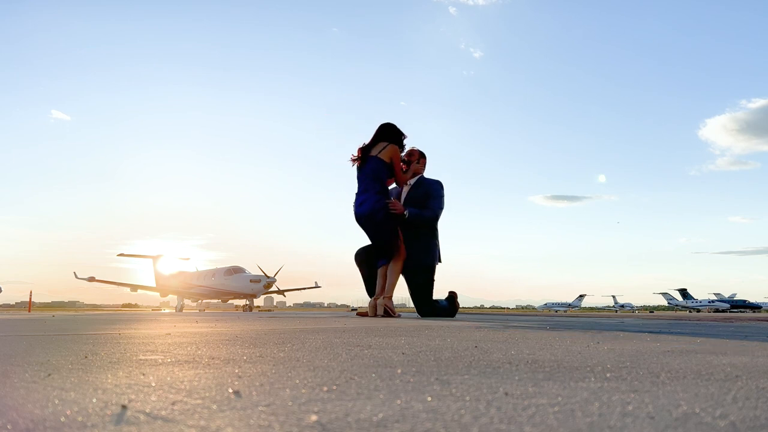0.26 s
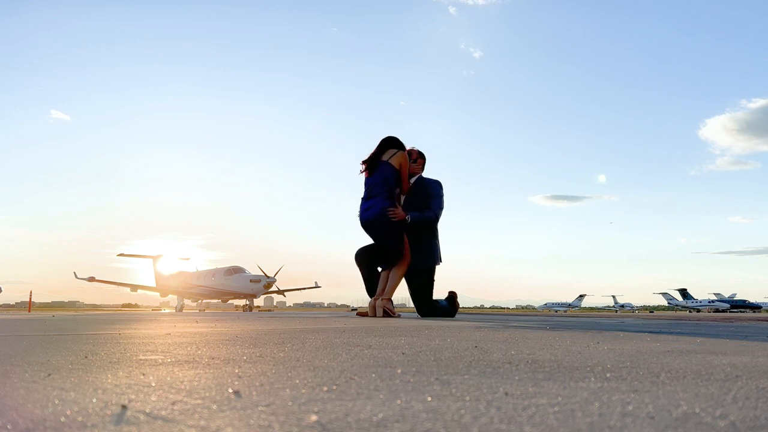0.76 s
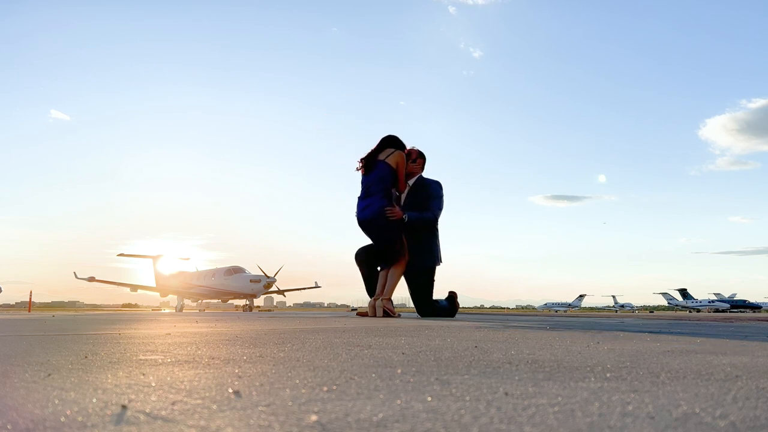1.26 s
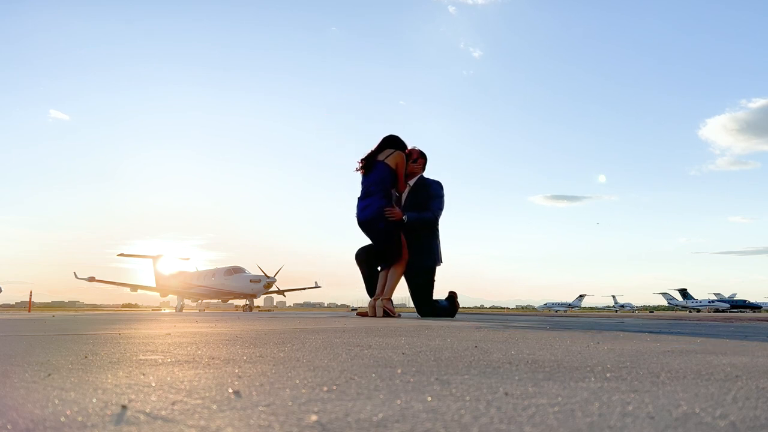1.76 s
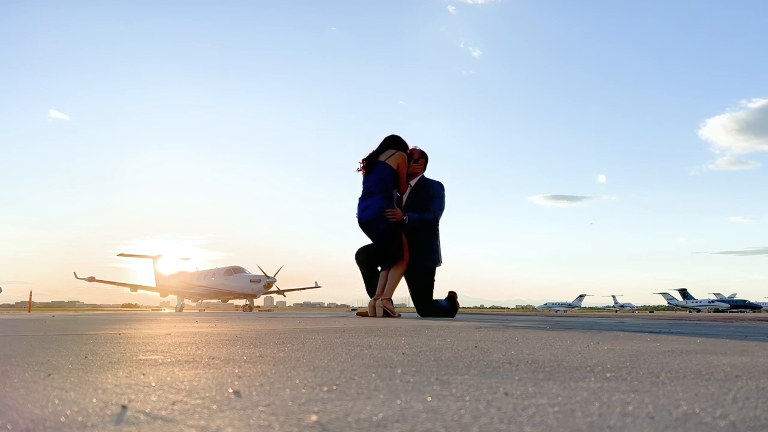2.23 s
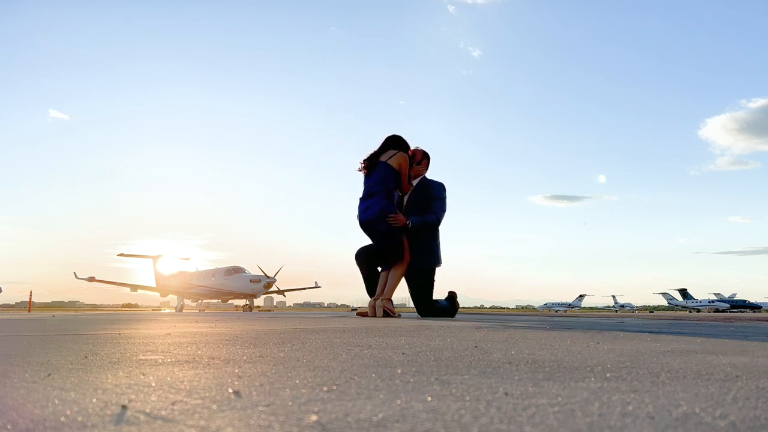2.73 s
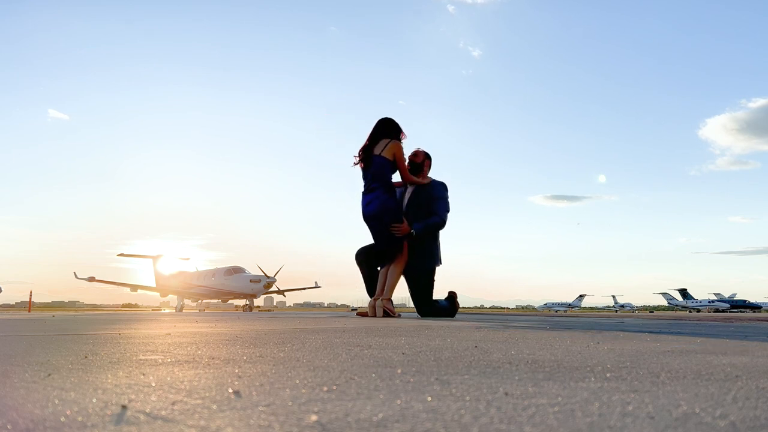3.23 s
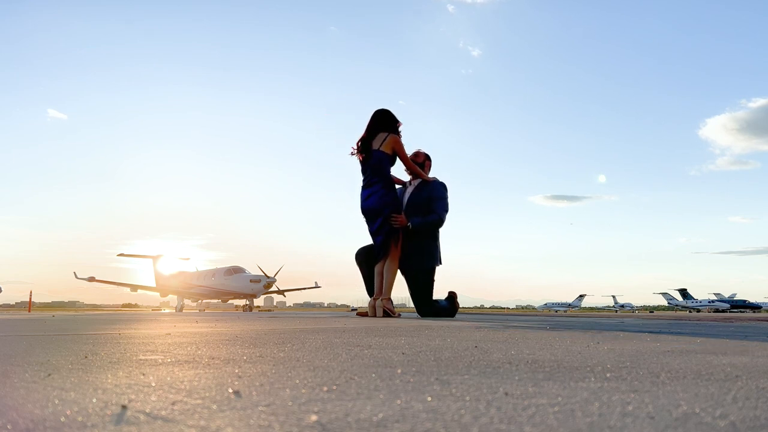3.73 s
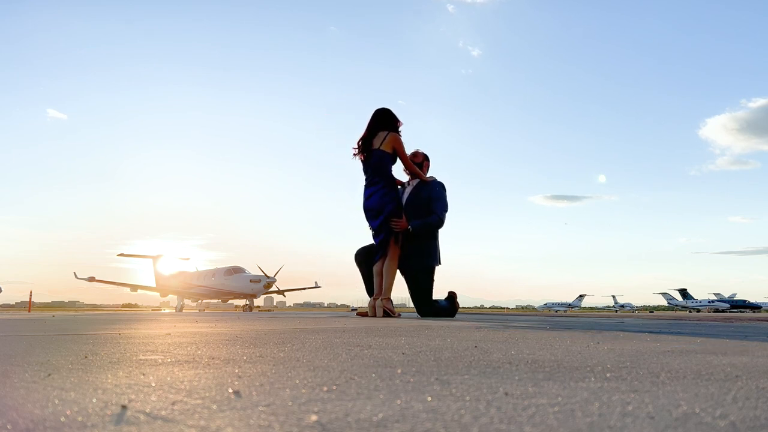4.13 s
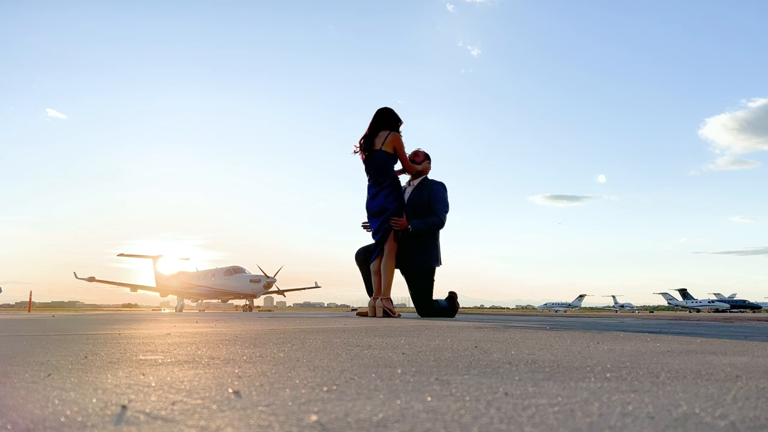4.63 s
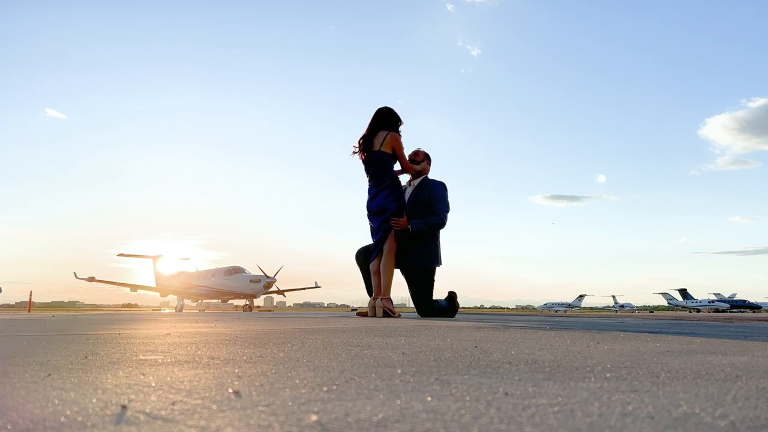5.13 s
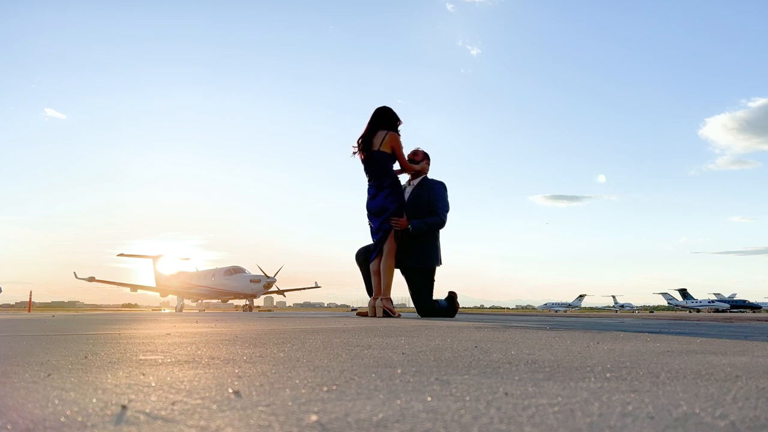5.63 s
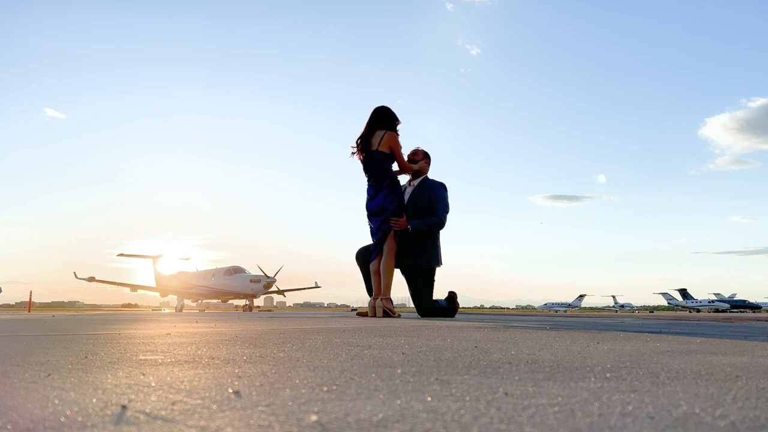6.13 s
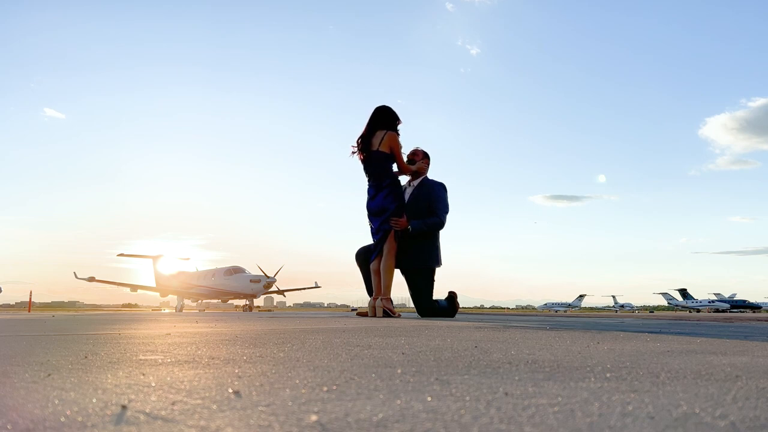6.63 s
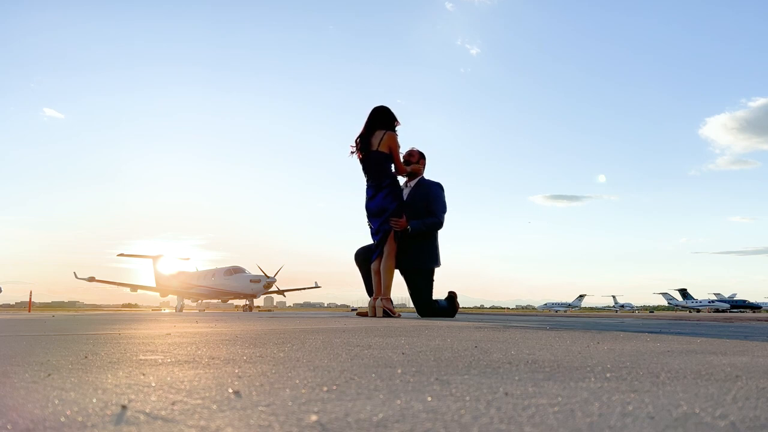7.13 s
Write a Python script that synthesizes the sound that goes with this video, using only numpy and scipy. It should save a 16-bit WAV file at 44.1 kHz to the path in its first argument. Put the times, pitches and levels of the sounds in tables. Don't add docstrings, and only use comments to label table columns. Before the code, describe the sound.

Outdoors on an airport apron, two far propeller aircraft hold a low, steady drone whose throbbing gradually quickens over a dull rumble. Faint crickets chirp. Close to a low stereo microphone, a shoe scrapes grit, then a small motor ticks rapidly until about three seconds. After that come heavy soft thuds of steps, crunching grit and cloth rustle, thinning to sparse crackles at the end.

```python
import sys
import numpy as np
from scipy import signal
from scipy.fft import rfft, irfft, next_fast_len
from scipy.io import wavfile
from scipy.ndimage import uniform_filter1d

SR = 44100
rng = np.random.default_rng(int(sys.argv[2]) if len(sys.argv) > 2 else 0)


def magnitude_from_level(level_db):
    exponent = np.asarray(level_db, float) / 20
    return 10 ** exponent


def materialize(psi):
    bounded = np.clip(np.atleast_2d(psi).T, -1, 1)
    quanta = np.round(bounded * 32767).astype(np.int16)
    wavfile.write(sys.argv[1], SR, quanta)


N = 325899
T = np.arange(N) / SR
M = next_fast_len(N + 4096)
HZ = np.arange(M // 2 + 1) * SR / M + 1e-3


def times(length_s):
    return np.arange(int(length_s * SR)) / SR


def follow(table, t=T):
    return np.interp(t, *np.transpose(table))


def walk(rate):
    steps = np.repeat(rng.standard_normal(int(N / SR * rate) + 2), 8)
    steps = uniform_filter1d(steps, 8)
    return 1.91 * np.interp(T, np.arange(len(steps)) / 8 / rate, steps)


def band(x, lo_hz, hi_hz):
    edges = [lo_hz, min(hi_hz, SR * .45)]
    return signal.sosfilt(signal.butter(3, edges, "band", fs=SR, output="sos"), x)


def unit(x):
    return x / np.sqrt(np.mean(x ** 2))


def ports(x, pan_db, lag):
    return np.array([np.roll(x, lag) * magnitude_from_level(pan_db / 2), x * magnitude_from_level(-pan_db / 2)])


def add(out, s, x):
    i = int(s * SR)
    n = min(x.shape[1], N - i)
    out[:, i:i + n] += x[:, :n]


# (frequency [Hz], left phase [rad], left minus right [dB])
SHADOW = [(280, 0, 0.5), (1040, -3, 3.5), (2000, -4.5, 3.5), (3200, -5.5, 1), (4330, -5.5, 6.5),
          (4500, -4, 5), (6130, -11.5, 6.5), (6960, -10.5, 1.3), (7760, -17.5, 0), (12000, -26, 4),
          (15600, -33, -2)]


def shadow():
    hz, phase, db = np.transpose(SHADOW)
    return magnitude_from_level(np.interp(HZ, hz, db)) * np.exp(1j * np.interp(HZ, hz, phase))


# (frequency [Hz], spectral density [dB per Hz])
ROAR = [(20, -93), (30, -87.5), (50, -64.5), (100, -63.5), (190, -72), (330, -78.5), (600, -84),
        (950, -88.5), (1250, -96), (1600, -104), (2200, -109.5), (3300, -121), (6000, -123), (9000, -128),
        (15000, -141)]
# (frequency [Hz], share [0-1])
ALIKE = [(60, .95), (150, 0.58), (300, 0.28), (700, 0.12), (2000, 0.87), (8000, 0.03)]
# (time [s], level [dB])
SWELL = [(0.0, -56.5), (0.82, -57), (1.58, -57), (7.0, -57.5), (7.39, -55.5)]


def roar():
    octave = np.log2(HZ)
    roar_hz, density_db = np.transpose(ROAR)
    alike_hz, alike = np.transpose(ALIKE)
    colour = magnitude_from_level(np.interp(octave, np.log2(roar_hz), density_db)) * np.sqrt(SR / 2)
    share = np.clip(np.interp(octave, np.log2(alike_hz), alike), 0, 1)
    common, left, right = rfft(rng.standard_normal((3, M)))
    side = shadow()
    coherent = np.sqrt(share) * common * np.array([side, np.ones_like(side)])
    separate = np.sqrt(1 - share) * np.array([left * abs(side), right])
    pair = colour * (coherent + separate)
    swell_db = follow(SWELL)
    swell_db = swell_db - swell_db.mean()
    out = 0
    for centre in np.arange(4, 15, .5):
        part = np.clip(1 - 2 * abs(octave - centre), 0, 1)
        swell_share = np.exp(-((centre - 9.8) / 3.1) ** 2)
        flicker_db = 1.2 * walk(6) + 3.5 * (centre > 13.7) * walk(22)
        out = out + magnitude_from_level(swell_share * swell_db + flicker_db) * irfft(pair * part, M)[:, :N]
    return out


def drifts():
    moan_db = np.interp(T, [0, .6, 1.3, 1.8], [-73.0, -57.0, -60.5, -82.0])
    moan = unit(band(rng.standard_normal(N), 470, 560)) * magnitude_from_level(moan_db)
    gust_db = -54 - 14 * (T - 4.1) ** 2 + 6 * walk(11)
    return moan + magnitude_from_level(gust_db) * unit(band(rng.standard_normal((2, N)), 25, 120))


# (time [s], level [dB])
JET = [(0, -74), (.45, -74), (.8, -86), (3.2, -85.5), (3.45, -67), (3.7, -89), (4.25, -90), (4.5, -72),
       (4.75, -88), (5.5, -81), (5.85, -92), (6.3, -82), (6.6, -70), (6.85, -87.5), (7.39, -76)]


def jet():
    return unit(band(rng.standard_normal((2, N)), 950, 1750)) * magnitude_from_level(follow(JET))


# (start [Hz], fall [Hz], stroke [s], echo delay [s], echo [dB], level [dB],
# left minus right [dB], first gap [s], growth of each gap [s], opening stroke [dB])
NEAR_CRICKET = (4590, 470, .024, .013, -16, -.5, 4.3, .0432, .0058, -6)
FAR_CRICKET = (4630, 400, .023, .0245, -8, -4, 8.5, .033, .0014, -11)
# (time [s], strokes [count], peak [dB], last stroke [dB])
NEAR_CHIRPS = [
    (.8584, 4, -59.5, -1.5),
    (2.1595, 4, -60.5, -3),
    (3.241, 4, -60.5, -1.5),
    (4.47, 4, -66.5, -1.5),
    (6.228, 4, -63.5, -1),
]
FAR_CHIRPS = [
    (.697, 4, -65, 2.5),
    (1.303, 4, -64, 0),
    (1.885, 4, -65.5, 0.5),
    (2.619, 4, -65.5, -4),
    (3.355, 4, -66, -3),
    (4.333, 4, -69.5, -1),
    (5.577, 4, -67, -15.5),
    (6.557, 4, -69, 2.5),
    (7.28, 4, -67.5, 2),
]


def cricket(chirps, voice):
    hz, fall_hz, length, echo_s, echo_db, trim_db, pan_db, gap, stretch, opening_db = voice
    opening_drop_hz, tail_db, tail_t60_s = 130, -12, 0.14
    swell_db = [opening_db, -1.5, 0, 0, 0]
    out, t = np.zeros((2, N)), times(.09)
    progress = np.clip(t / length, 0, 1)
    shape = np.sin(np.pi * progress ** .95) ** 1.2
    chances = rng.standard_normal((len(chirps), 5, 2))
    for (s, strokes, db, last_db), chance in zip(chirps, chances):
        strokes = round(strokes)
        for k in range(strokes):
            start_hz = hz + 30 * chance[k, 0] - opening_drop_hz * (k == 0)
            glide = start_hz - fall_hz * progress ** 2.3
            stroke = shape * np.sin(2 * np.pi * np.cumsum(glide) / SR)
            echoes = np.roll(stroke, int(echo_s * SR)) + .4 * np.roll(stroke, int(2.4 * echo_s * SR))
            stroke = stroke + magnitude_from_level(echo_db) * echoes
            stroke_db = db + trim_db + swell_db[k] + last_db * (k == strokes - 1) + chance[k, 1]
            start = s + k * gap + stretch * k * (k - 1) / 2 - .0055
            add(out, start, ports(magnitude_from_level(stroke_db) * stroke, pan_db, 10))
    t = times(.1)
    tail = rng.standard_normal((2, len(t))) * magnitude_from_level(-60 * t / tail_t60_s) * (t > .004)
    tail = tail / np.sqrt(np.sum(tail ** 2) / 2)
    return out + magnitude_from_level(tail_db) * signal.fftconvolve(out, tail, axes=1)[:, :N]


def grains(rate, scatter_db):
    hits = (rng.random(N) < rate / SR) * magnitude_from_level(scatter_db * rng.exponential(size=N))
    return unit(rng.standard_normal(N) * (1 + signal.lfilter([1], [1, -.97], hits)))


# (from [s], to [s], 1.4-3 kHz [dB], 5.8-9.6 kHz [dB], 7.1-12 kHz [dB])
SCUFFS = [(0, 0.03, -68, -68, -73), (0.299, 0.316, -63, -62, -52.5), (0.327, 0.387, -67, -62.5, -71.5),
          (2.722, 2.734, -61, -75, -94), (3.208, 3.241, -74, -74, -84), (3.92, 3.929, -67, -63, -74.5),
          (3.943, 3.949, -64, -84, -89.5), (3.956, 3.996, -77, -79, -88.5), (4.064, 4.302, -78, -91, -105),
          (4.863, 4.967, -72.5, -79, -100), (5.999, 6.003, -68.5, -70, -68),
          (6.095, 6.123, -71.5, -77, -78.5), (6.199, 6.307, -76.5, -90, -90),
          (6.412, 6.498, -79.5, -77.5, -78.5), (6.859, 6.91, -81.5, -79, -83),
          (7.043, 7.082, -85, -82, -81)]


def scuffs():
    grit = grains(610, 2.4)
    bands_hz = [(1400, 3050), (5800, 9600), (7100, 12000)]
    layers = [unit(band(grit, *edges)) for edges in bands_hz]
    drag = np.zeros(N)
    for start, end, *levels in SCUFFS:
        span = slice(int(start * SR), int((end + 0.024) * SR))
        gate = np.interp(T[span], [start, start + 0.0022, end, end + 0.015], [0.28, 1.54, 0.59, 0.05])
        drag[span] += gate * sum(magnitude_from_level(db) * layer[span] for db, layer in zip(levels, layers))
    return ports(drag, -1.2, 0)


# (time [s], 2-8 kHz level [dB])
CLOTH = [(0.0, -75), (0.66, -83), (0.9, -89), (1.09, -91.5), (1.83, -91), (2.7, -78), (3.07, -71),
         (3.38, -71.5), (3.6, -74), (3.72, -84), (3.87, -69), (4.03, -77.5), (4.15, -74), (4.3, -75),
         (4.45, -75.5), (4.67, -87), (5.45, -78), (5.6, -72.5), (5.76, -96), (5.99, -90), (6.25, -74),
         (6.48, -77.5), (6.83, -97.5), (7.39, -90)]


def cloth():
    rub = unit(band([grains(180, 2.8) for port in "LR"], 1800, 7200))
    return rub * magnitude_from_level(follow(CLOTH) - 5.5 + walk(11))


# (time [s], pitch [Hz], level [dB])
SQUEAKS = [
    [(2.25, 10560, -87), (2.35, 11960, -84.5), (2.41, 12200, -82), (2.47, 13500, -82), (2.53, 11400, -83),
     (2.6, 11200, -99)],
    [(3.76, 11200, -88), (3.85, 12060, -86), (3.92, 11700, -84), (3.99, 12000, -95)],
]


def squeaks():
    out = 0
    for table in SQUEAKS:
        s, hz, db = np.transpose(table)
        pitch = np.interp(T, s, hz) + 450 * walk(400)
        level = magnitude_from_level(np.interp(T, s, db, -200, -200) + 1.8 * walk(120))
        out = out + level * np.sin(2 * np.pi * np.cumsum(pitch) / SR)
    return ports(out, -1.2, 0)


# (time [s], peak [dB], frequency [Hz])
THUDS = [
    (3.383, -20.5, 92),
    (3.502, -49, 75),
    (3.568, -27.5, 61.6),
    (3.801, -57, 83.4),
    (4.032, -38, 89),
    (4.698, -26.5, 79),
    (4.875, -21, 74),
]
# (time [s], peak [dB], frequency [Hz])
HEEL = (0.4465, -40.5, 587)


def thuds():
    out, t = np.zeros((2, N)), times(.08)
    sway_hz, sway_db = 44.6, -17
    sway = np.sin(np.pi * t / t[-1]) ** 2 * np.sin(2 * np.pi * sway_hz * t)
    for s, db, hz in THUDS + [HEEL]:
        push = t / max(0.76 / hz, .003)
        rock = push * np.exp(1 - push) * np.sin(2 * np.pi * hz * t)
        add(out, s - .004, ports(magnitude_from_level(db - 1.5) * rock, .5, 0))
        if hz < 200:
            add(out, s - .01, ports(magnitude_from_level(db + sway_db) * sway, 0, 0))
    return out


# (time [s], frequency [Hz], t60 [s], level [dB])
RINGS = [(.345, 1780, 0.023, -46), (.442, 5040, .012, -70), (3.929, 1266, 0.05, -55),
         (4.185, 1150, 0.019, -54), (4.119, 2450, .04, -66), (4.938, 2310, .04, -69.5),
         (5.998, 387, .05, -49), (6.113, 10830, .04, -68), (6.232, 11900, .04, -52),
         (6.436, 2380, 0.083, -63.5), (6.437, 4730, 0.1, -68), (6.44, 11320, .05, -66),
         (6.452, 2560, 0.049, -68), (7.046, 3200, .03, -68), (7.066, 3710, .03, -65.5),
         (7.253, 2570, 0.054, -70)]


def rings():
    out, t = np.zeros((2, N)), times(0.076)
    noises = rng.standard_normal((len(RINGS), len(t)))
    for (s, hz, t60, db), noise in zip(RINGS, noises):
        rough = 1 + 8.2 * uniform_filter1d(noise, size=60)
        envelope = np.clip(t / 0.00083, 0, 1) * magnitude_from_level(db - 60 * t / t60)
        add(out, s, ports(rough * envelope * np.sin(2 * np.pi * hz * t), 1.5, 0))
    return out


def cracks(table, bands_hz, ring_s, tail_db, pans_db):
    out, t = np.zeros((2, N)), times(0.036)
    noise = rng.standard_normal((len(table), len(t)))
    snap = 2.5 * np.sqrt(8) * (np.arange(len(t)) == int(.0015 * SR))
    attack = np.clip(t / 0.0018, 0, 1) ** 2
    decay = np.exp(-np.maximum(t - .0012, 0) / ring_s) + magnitude_from_level(tail_db) * np.exp(-t / 0.013)
    bursts = (noise + snap) * attack * decay
    parts = [band(bursts, *edges) for edges in bands_hz]
    first = int(0.0026 * SR)
    for k, (s, *levels) in enumerate(table):
        mix = sum(magnitude_from_level(db) * p[k] / p[k, :first].std() for db, p in zip(levels, parts))
        add(out, s - .0017, ports(mix, pans_db[k], 0))
    return out


# (time [s], low [dB], middle [dB], top [dB], left minus right [dB])
KNOCKS = [
    (2.7224, -61, -56.5, -79, -4),
    (2.727, -51, -59, -68, 2),
    (2.7307, -56, -64, -70, 5),
    (2.745, -81, -81, -72, 1),
    (2.7977, -65, -58.5, -81, 5),
    (2.8016, -57, -61, -82, 1),
    (2.8078, -72, -74, -82, 0),
    (2.818, -71, -74, -82, 3),
    (4.8996, -61, -51, -74, 4.5),
]
# (from [Hz], to [Hz])
KNOCK_BANDS_HZ = [(2100, 3040), (3300, 4360), (5900, 6700)]
SLAM_BANDS_HZ = [(1100, 2500), (3700, 6600), (8400, 15900)]


def knocks():
    small = cracks(KNOCKS[:-1], KNOCK_BANDS_HZ, 0.0015, -28, np.array(KNOCKS)[:, -1])
    return small + cracks(KNOCKS[-1:], SLAM_BANDS_HZ, 0.00051, -18.5, [8.0])


# (frequency [Hz], t60 [s], level [dB])
CASE = [(547, 0.0088, -30.5), (850, 0.01, -35.5), (1505, 0.012, -30.5), (2200, 0.0075, -33.5),
        (4050, .004, -53), (4900, 0.0036, -54)]


def case():
    out, t = np.zeros((2, N)), times(.03)
    ring = 0
    for k, (hz, t60, db) in enumerate(CASE):
        ring = ring + (-1) ** k * magnitude_from_level(db - 60 * t / t60) * np.sin(2 * np.pi * hz * t)
    add(out, KNOCKS[-1][0] - .0006, ports(ring * np.clip(t / 0.00046, 0, 1), 5.1, 0))
    return out


# (share of the turn [0-1], level [dB], low ring [dB])
TICKS = [
    (0, 0, 3),
    (0.517, -6, 4),
    (0.721, -11, -2),
    (0.774, -5.5, 2),
    (.813, -7, -0.5),
]
# (time [s], level [dB])
MOTOR = [(.45, -101), (.62, -63), (1.5, -60), (2.7, -62.5), (3.0, -68.5), (3.3, -74)]
# (frequency [Hz], t60 [s], level [dB])
CASING = [(2100, 0.027, -0.5), (6370, 0.014, -7.5), (8000, 0.0088, -9), (8930, 0.011, -3),
          (11900, 0.0066, -9)]


def motor():
    turn_s, turns, snap_db = .14765, 19, 1
    out, t = np.zeros((2, N)), times(.03)
    noise = rng.standard_normal((turns * len(TICKS), len(t)))
    snaps = iter(band(noise * np.exp(-t / .002), 5200, 10000))
    for start in .4765 + turn_s * np.arange(turns):
        for share, db, dull_db in TICKS:
            chance = rng.standard_normal((len(CASING), 3))
            ring = magnitude_from_level(snap_db) * next(snaps)
            for (hz, t60, mode_db), c in zip(CASING, chance):
                level = magnitude_from_level(mode_db + 1.9 * c[0] + dull_db * (hz < 5000))
                ring = ring + level * magnitude_from_level(-60 * t / t60) * np.sin(2 * np.pi * hz * (1 + c[1] / 45) * t)
            ring = ring * (1 + 0.43 * uniform_filter1d(rng.standard_normal(len(t)), size=4))
            s = start + share * turn_s + 0.00064 * chance[0, 2]
            level = magnitude_from_level(db + follow(MOTOR, s))
            add(out, s, ports(ring * np.clip(t / 0.00083, 0, 1) * level, -1.5, 0))
    return out


# (time [s], 1.9-2.7 kHz
# [dB], 3.1-5 kHz [dB], 5.4-8.7 kHz [dB], 10.6-15.6 kHz [dB])
CRACKS = [(0.0249, -78.5, -86, -78, -80.5), (0.0364, -66, -87, -84, -83.5),
          (0.1222, -68, -90, -93.0, -99.5), (0.3013, -54, -74, -48, -50.5), (0.3138, -67.0, -77, -54, -52),
          (0.3472, -52, -80, -64, -64.5), (2.9159, -71, -87, -88, -82.5), (3.0042, -66, -76, -85, -88.5),
          (3.093, -68, -82, -76, -90.5), (3.1733, -68, -77.0, -90.0, -97), (3.2047, -75, -76.0, -66, -82.5),
          (3.2107, -78, -80, -58.5, -65), (3.2187, -74, -72, -64, -70), (3.2327, -72, -81.5, -65, -81.5),
          (3.3569, -65, -78, -75, -88), (3.3863, -64, -69, -67.5, -95), (3.4861, -63, -67, -63, -87.5),
          (3.4971, -63, -65, -64, -82), (3.5095, -68, -70, -75, -99.0), (3.5639, -72, -74, -72, -90.5),
          (3.5963, -72, -83, -75, -92), (3.8408, -70, -74, -77, -90), (3.9361, -66, -57.5, -51.5, -71),
          (4.0613, -76, -78.0, -64, -80), (4.0732, -73, -79.5, -61, -89.5), (4.0787, -72, -82, -56, -75.5),
          (4.1067, -68.5, -75, -66, -82.5), (4.1137, -62, -69, -79, -100.0), (4.1221, -57, -61, -51, -81.5),
          (4.1266, -64, -71, -58, -81), (4.1381, -62, -71, -66, -76.5), (4.1486, -75.5, -75, -54.5, -76),
          (4.188, -56.5, -57.5, -55, -82), (4.1995, -64.5, -77.5, -65, -99.5),
          (4.2389, -59.5, -61, -61, -82), (4.2513, -66, -81.0, -76.5, -95), (4.2568, -70, -75, -65, -100),
          (4.2693, -71, -69, -66.5, -95.5), (4.2853, -70, -71, -69, -92.5),
          (4.3691, -76, -83, -84.5, -81.5),
          (4.449, -72, -83, -88, -97), (4.5162, -76, -77, -72.5, -87.5),
               (4.5243, -71, -85, -86, -100.5), (4.5952, -75, -83, -82, -95.5),
               (4.6035, -77, -75, -96, -101.5), (4.627, -76, -79, -75, -97),
               (4.939, -77, -69.5, -69, -87.5), (5.018, -75, -77, -73, -90.5),
               (5.0858, -72, -79.5, -72.5, -81.5), (5.137, -73, -78, -84, -91.5),
               (5.2013, -71.5, -79, -73.5, -103.0), (5.2307, -64, -65.5, -74, -89.5),
               (5.2445, -74, -81, -93, -106.0), (5.4645, -79, -74, -62.5, -85.5),
               (5.487, -86, -88, -65, -90), (5.5999, -70, -73, -69, -90.5), (6.0014, -76, -74, -62.5, -73),
               (6.006, -66.5, -79, -66, -74), (6.0102, -71, -72, -64, -74), (6.092, -81, -71, -67, -71.5),
               (6.1016, -77, -65.5, -70, -84.5), (6.1152, -84.0, -76, -77, -70),
               (6.1455, -70, -73, -72, -79), (6.1999, -80, -84, -79.5, -76.5),
               (6.2114, -75, -80, -74.5, -77.0), (6.2216, -83.5, -82, -78, -68),
               (6.236, -79, -72.0, -74, -56.5), (6.243, -77, -72.5, -65, -59.5),
               (6.266, -65, -64, -69, -79.5), (6.385, -79.0, -80, -75, -77.5),
               (6.4149, -84.0, -92, -85.5, -70), (6.4249, -84, -80, -79, -75),
               (6.4403, -71, -71.5, -68.5, -62), (6.8584, -71, -76, -65, -83),
               (6.8692, -75, -77.5, -74, -76), (7.039, -84, -84, -85, -77.5), (7.048, -79, -83, -69.5, -69),
               (7.262, -70, -90, -71, -81.5), (7.3378, -73, -80, -71, -87), (7.371, -72, -90, -68.5, -91.5),
          (1.402, -84.5, -84, -75, -85.5), (2.465, -87, -73, -68, -87), (.321, -64, -76, -70, -67),
          (.443, -68, -73, -75, -93), (3.93, -75.5, -57.5, -54, -74), (3.9325, -70, -57, -48, -75),
          (4.067, -82, -78, -70, -88), (4.095, -80, -78, -63, -91), (4.153, -80, -78, -70, -92),
          (4.212, -70, -66, -73, -91), (4.361, -84, -84, -69.5, -88.5), (4.867, -81, -73, -77.5, -84.5),
          (5.362, -88, -88, -75, -93), (5.373, -81, -78, -76, -95), (6.158, -84, -83, -84, -75.5),
          (6.997, -76.5, -87, -81, -83)]
# (from [Hz], to [Hz])
GRIT_BANDS_HZ = [(1900, 2660), (3100, 5000), (5400, 8700), (10600, 15600)]


def grit():
    stones = CRACKS
    pans_db = -0.5 + rng.standard_normal(len(stones))
    return cracks(stones, GRIT_BANDS_HZ, 0.00023, -23.5, pans_db)


# (time [s], level [dB], overtone tilt [dB per octave])
SLOWING = [(0, -39, 2.5), (.39, -44, 4.5), (.78, -44, 0.5), (1.17, -37, -2), (1.56, -39, 2),
           (1.94, -38, 0.5), (2.33, -40, 0), (2.719, -36.5, 1), (3.111, -33.5, -1), (3.89, -38, -2.5),
           (4.279, -42.5, -1), (4.67, -38, 0.5), (5.06, -41, 0.5), (5.45, -34.5, -0.5), (5.83, -33.5, -4),
           (6.219, -33.5, -3.5), (7.39, -36, -2)]
RISING = [(0, -46, 2), (.39, -41, -2), (.78, -34.5, -5), (1.56, -48, -8.5), (1.94, -36, -16),
          (2.33, -32, -25.5), (2.58, -40.5, -19), (2.72, -39.5, -16), (3.5, -42.5, -10), (3.889, -43, -1.5),
          (4.67, -34.5, -6), (5.059, -37.5, -0.5), (5.83, -37, -3), (6.22, -36.5, -3), (7, -36, -1.5),
          (7.39, -39.5, 2.5)]
# (time [s], frequency [Hz])
SLOWING_RATE = [(0, 73.82), (1.94, 73.69), (2.33, 73.61), (3.11, 73.33), (3.5, 73.3), (3.89, 73.2),
                (4.28, 72.82), (4.67, 72.21), (5.06, 71.69), (5.45, 71.37), (6.22, 70.94), (6.61, 70.57),
                (7.39, 69.57)]
RISING_RATE = [(0, 76.35), (.78, 76.41), (1.17, 76.48), (1.56, 76.63), (2.33, 77.08), (2.72, 77.1),
               (3.11, 77.18), (3.89, 77.74), (4.28, 77.97), (5.45, 78.68), (5.83, 78.86), (7.39, 79.18)]
SLOWING_TONES_DB = [0, -7, -12.5, -17.5, -21, -32, -31]
RISING_TONES_DB = [1, -8.5, -14.5, -28, -41.5]
# (frequency [Hz], width [Hz], lift [dB])
STANDING = [(288.2, 2.4, 7), (141.2, 1.3, 4)]


def propeller(rate, carry, tones_db, pan_db, lead, flutter_db, wander):
    s, level_db, tilt_db = np.transpose(carry)
    hz = follow(rate)
    turn = 2 * np.pi * (.33 + np.cumsum(hz) / SR)
    out, side = 0, np.array([[.5], [-.5]])
    for order, tone_db in enumerate(tones_db, 1):
        db = np.interp(T, s, tone_db + level_db + tilt_db * np.log2(order))
        for at, width, lift_db in STANDING:
            db = db + lift_db * np.exp(-.5 * ((order * hz - at) / width) ** 2)
        flutter = flutter_db * order ** .5 * walk(9)
        gain = magnitude_from_level(db + flutter + side * (pan_db + 0.44 * walk(0.94)))
        drift = (wander * walk(1.5) + 2.08) * (order - 1) + 0.045 * order * walk(12)
        out = out + np.sqrt(2) * gain * np.cos(order * turn + drift + side * lead * order)
    return out


def scene():
    far = roar() + drifts() + jet()
    far = far + cricket(NEAR_CHIRPS, NEAR_CRICKET) + cricket(FAR_CHIRPS, FAR_CRICKET)
    near = scuffs() + cloth() + squeaks() + motor() + grit()
    near[0] = irfft(rfft(near[0], M) * shadow(), M)[:N]
    ahead = thuds() + rings() + knocks() + case()
    slowing = propeller(SLOWING_RATE, SLOWING, SLOWING_TONES_DB,
                        pan_db=0.29, lead=0.19, flutter_db=0.4, wander=0.38)
    rising = propeller(RISING_RATE, RISING, RISING_TONES_DB,
                       pan_db=1.3, lead=0.069, flutter_db=0.77, wander=0.35)
    return far + near + ahead + slowing + rising


# (frequency [Hz], width [Hz], level [dB])
MIC = [(10300, 230, -7.5), (13950, 420, -12.5), (3040, 1900, 0.12), (15150, 400, 5), (9630, 110, 7)]


def band_limit(x):
    return signal.sosfilt(signal.butter(12, 16520, fs=SR, output="sos"), x)


def record(dry):
    colour_db = -60 * (HZ > 15850)
    for hz, width, db in MIC:
        colour_db = colour_db + db * np.exp(-.5 * ((HZ - hz) / width) ** 2)
    padded = np.pad(dry, ((0, 0), (2048, 2048)), "reflect")
    sound = irfft(rfft(padded, M) * magnitude_from_level(colour_db), M)[:, 2048:2048 + N]
    fade = np.clip((N / SR - T) / 0.0034, 0, 1)
    return band_limit(sound * fade)


dry = scene()
out = record(dry)
materialize(out)
```